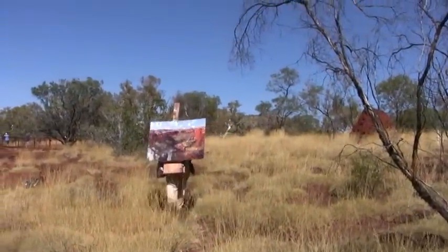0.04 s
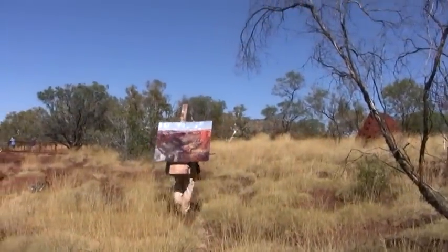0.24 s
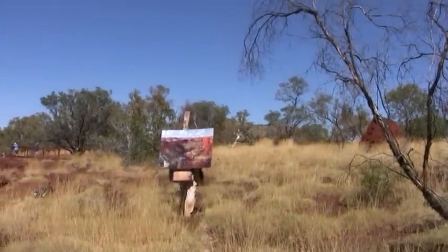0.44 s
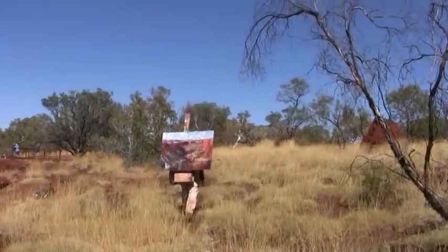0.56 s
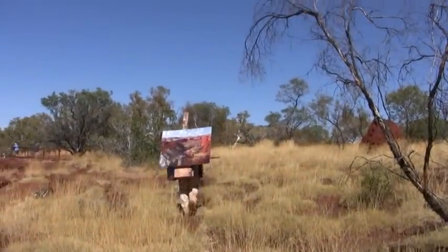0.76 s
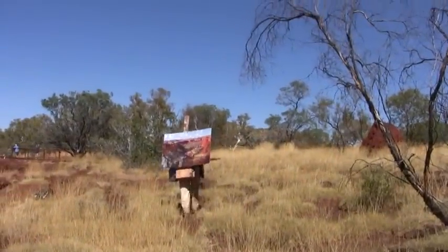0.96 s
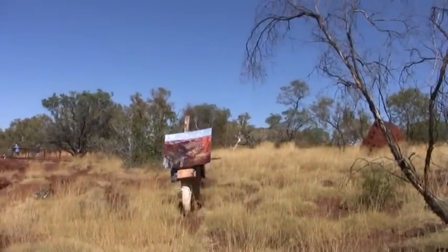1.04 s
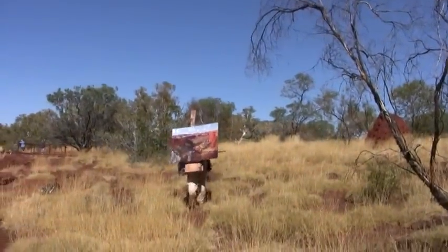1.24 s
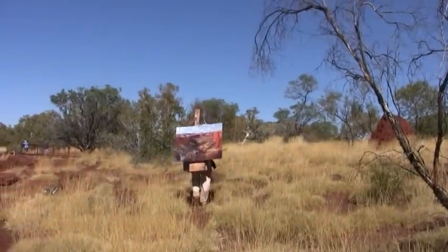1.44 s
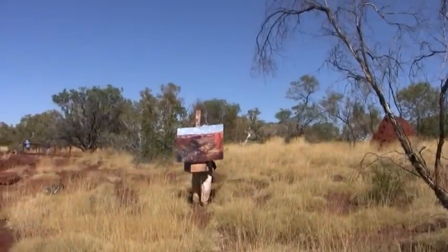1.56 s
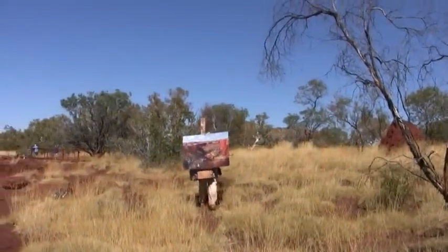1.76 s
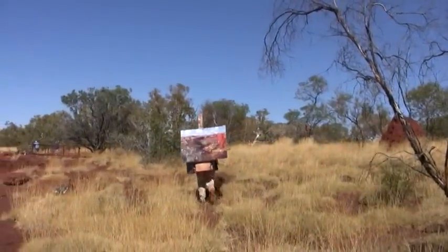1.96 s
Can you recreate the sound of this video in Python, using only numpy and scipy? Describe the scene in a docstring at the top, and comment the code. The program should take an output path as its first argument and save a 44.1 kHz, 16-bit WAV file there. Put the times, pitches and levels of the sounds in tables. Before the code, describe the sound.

Slow footsteps crunch through dry grass and gritty soil close to the microphone, with stalks swishing and snapping. Low wind gusts thump at the start and end, a wooden knock comes late, and distant birds chirp outdoors.

```python
"""Open bushland: someone carrying a wooden easel walks through dry grass, close to the microphone.
Soles crunch and stalks swish as shaped streams of tiny fractures; twigs and clods crack as rough rings,
stalks snap as noise bursts, and the easel knocks softly as fading wood tones.
Gusts thump on the microphone as low, uneven noise. Far birds chirp in arched tones over a flock of
wavering ones, with a scattered tail, above a steady hush of coloured noise."""
import sys
import numpy as np
from scipy import signal
from scipy.fft import rfft, irfft, next_fast_len
from scipy.io import wavfile
from scipy.ndimage import uniform_filter1d, map_coordinates

SR = 44100
rng = np.random.default_rng(int(sys.argv[2]) if len(sys.argv) > 2 else 0)


def to_wav(s):
    """Save 16-bit WAV."""
    ch = np.atleast_2d(s).T  # columns
    pcm = np.round(np.clip(ch, -1, 1) * 32767)  # PCM
    wavfile.write(sys.argv[1], SR, pcm.astype(np.int16))


N = 88464

# How alike footfall and grass sound left and right. Each row: frequency in Hz, coherence from 0 to 1.
STEP_ALIKE = [(400, 0.98), (1200, 1), (2200, 1), (4000, 0.87), (10000, 0.59)]


def amp(db):
    """Decibels to gain."""
    return 10 ** (np.asarray(db) / 20)


def unit(x):
    """Scale to an rms of 1, over both channels together."""
    return x / np.sqrt(np.mean(x ** 2) + 1e-20)


def clock():
    """Time of each sample in seconds."""
    return np.arange(N) / SR


def curve(rows):
    """Join rows of seconds and value by straight lines, one value per sample."""
    return np.interp(clock(), *np.transpose(rows))


def along(points, hz):
    """Read points of Hz and value on a log frequency axis."""
    f, v = np.transpose(points)
    return np.interp(np.log(hz + 1), np.log(f + 1), v)


def wobble(rate):
    """A smooth random curve through normally distributed knots, rate of them a second."""
    knots = rng.standard_normal(4096)
    return map_coordinates(knots, [clock() * rate + 2], mode="wrap")


def filtered(x, response):
    """Multiply the spectrum of x by a response of frequency."""
    m = next_fast_len(N + SR // 2)
    hz = np.fft.rfftfreq(m, 1 / SR)
    return irfft(rfft(x, m) * response(hz), m)[..., :N]


def spread(pair, spectrum, alike):
    """Colour two unrelated signals and blend them into left and right of a given coherence."""
    def mid_side_response(hz):
        turn = np.arccos(np.clip(along(alike, hz), -1, 1)) / 2
        return amp(along(spectrum, hz)) * [np.cos(turn), np.sin(turn)]

    mid, side = filtered(pair, mid_side_response)
    return np.array([mid + side, mid - side])


def grains(rate, spread_db):
    """Two streams of tiny fractures: random clicks of uneven size, rate of them a second."""
    size = amp(spread_db * np.minimum(rng.exponential(size=(2, N)), 4))
    happens = rng.random((2, N)) < rate / SR
    return happens * size * rng.choice([-1, 1], (2, N))


def strokes(rows, attack_s, release_s):
    """Each stroke rises up to its start, holds its length and dies away; their powers add."""
    t = clock()
    each = []
    for start, length, db in rows:
        attack = np.clip(1 + (t - start) / attack_s, 0, 1)
        release = np.exp(-np.maximum(t - start - length, 0) / release_s)
        each.append(amp(db) * attack * release)
    return np.linalg.norm(each, axis=0)


def two_toned_strokes(rows, attack_s, release_s, main, other):
    """Strokes that each blend two textures; the last column is the other texture's share of power."""
    out = np.zeros((2, N))
    for start, length, db, share in rows:
        share = np.clip(share, 0, 1)
        texture = np.sqrt(1 - share) * main + np.sqrt(share) * other
        out += strokes([(start, length, db)], attack_s, release_s) * texture
    return out


def add(track, s, sound):
    """Mix a sound into a track at a time in seconds."""
    part = track[..., max(round(s * SR), 0):][..., :sound.shape[-1]]
    part += sound[..., :part.shape[-1]]


def hush():
    """Steady air in far grass and trees: coloured noise, less alike left and right toward the treble."""
    # Colour of the air. Each row: frequency in Hz, relative level in dB.
    air_colour = [(20, -10), (50, 2), (100, -16), (160, -16.5), (280, -8.5), (400, -15), (540, -9.5),
                  (700, -14), (850, -12.5), (1100, -17), (1750, -15.5), (2100, -19.5), (2800, -20.5),
                  (3200, -16.5), (3650, -22.5), (4200, -23), (6000, -26), (10000, -29.5), (15700, -36)]
    # Left-right likeness. Each row: frequency in Hz, coherence from 0 to 1.
    air_alike = [(60, 1), (300, 0.98), (550, 0.79), (1200, 0.81), (2500, 0.64), (5000, 0.13),
                 (10000, 0.043)]
    air = unit(spread(rng.standard_normal((2, N)), air_colour, air_alike))
    return air * amp(-51.5 + 0.61 * wobble(6.56))


def eddies(spectrum):
    """Low turbulence: coloured noise with its short-term power evened out."""
    # Left-right likeness at the microphone. Each row: frequency in Hz, coherence from 0 to 1.
    wind_alike = [(40, .94), (100, .93), (250, .88)]
    pair = spread(rng.standard_normal((2, N)), spectrum, wind_alike)
    power = np.mean(np.abs(signal.hilbert(pair)) ** 2, axis=0)
    local_power = np.abs(uniform_filter1d(power, size=700))
    return unit(pair / np.sqrt(local_power + 1e-20))


def wind():
    """Gusts on the microphone: turbulent rumble with single thumping eddies and a higher flutter."""
    # Gust strength. Each row: time in seconds, level in dB before the rumble trim.
    gusts = [(0, -31), (.17, -35), (.3, -49), (.5, -38), (.64, -47.5), (.78, -55), (.9, -56), (1.0, -50),
             (1.08, -65), (1.35, -72), (1.47, -64), (1.62, -56), (1.72, -47), (1.8, -59), (1.9, -30),
             (2.0, -46)]
    # Single eddies thumping. Each row: start in seconds, length in seconds, level in dB before the trim.
    thumps = [(0.0, .015, -29), (.08, .03, -29.5), (.13, 0.019, -30), (.262, 0.026, -27),
              (.3, 0.041, -32.5), (.385, 0.022, -34.5), (.448, 0.0087, -32.5), (.478, 0.011, -29.5),
              (.602, 0.017, -38.5), (.805, 0.031, -47.5), (.935, 0.037, -43), (1.005, 0.023, -44.5),
              (1.405, 0.02, -42.5), (1.552, 0.02, -44), (1.578, 0.0085, -44), (1.753, 0.013, -31),
              (1.776, 0.01, -29), (1.806, 0.015, -29), (1.838, 0.031, -24), (1.928, .026, -26.5),
              (1.964, 0.021, -28), (1.997, 0.016, -19.5)]
    # Strongest gusts fluttering higher up. Each row: start in seconds, length in seconds, level in dB.
    flutters = [(.08, 0.027, -52), (1.83, 0.068, -64), (1.9, 0.024, -38), (1.975, .04, -32)]
    # Colours of rumble and flutter. Each row: frequency in Hz, relative level in dB.
    rumble_colour = [(15, -31), (25, -45), (45, -2), (70, 3.5), (100, 5), (135, 1), (180, -5.5),
                     (235, -13.5), (340, -26), (500, -35.5), (900, -70)]
    flutter_colour = [(80, -20.5), (170, -8), (240, -1.5), (330, -16), (500, -26.5), (1000, -57)]
    # Where the gust presses harder. Each row: time in seconds, dB added on the left and taken on the right.
    lean = [(0, .8), (.6, .2), (2, .05)]
    lump_db, lumps_per_s, rumble_trim_db = 1, 40, -1

    gusting = amp(curve(gusts) + lump_db * wobble(lumps_per_s))
    thumping = strokes(thumps, attack_s=.007, release_s=.007)
    rumble = amp(rumble_trim_db) * np.hypot(gusting, thumping) * eddies(rumble_colour)
    flutter = strokes(flutters, attack_s=0.011, release_s=.02) * eddies(flutter_colour)
    return (rumble + flutter) * amp(np.outer([1, -1], curve(lean)))


def crunches():
    """Soles press on gritty soil: fractures come in clumps, blending bright grit and dull soil."""
    # Each row: start in seconds, length in seconds, level in dB, share of dull soil from 0 to 1.
    presses = [(0.0, 0.015, -44.5, 0.47), (0.062, 0.087, -54.5, 0.03), (0.535, 0.05, -44.5, 0.55),
               (0.592, 0.034, -46, 0.64), (0.664, 0.018, -50, 0), (0.691, 0.0095, -46, 0.35),
               (0.716, 0.032, -51, 0.26), (1.193, .085, -52, 0.18), (1.301, 0.11, -54.5, 0.52),
               (1.707, 0.018, -51, 0.7), (1.747, 0.039, -55, 0.05), (1.865, 0.029, -57.5, 0),
               (1.964, 0.0065, -40.5, 0), (1.98, 0.023, -65, 1)]
    # Colours of grit and soil. Each row: frequency in Hz, relative level in dB.
    grit_colour = [(300, -7), (700, 3), (1150, 0), (1600, 1), (2200, -2), (3000, -10.5), (5000, -22.5),
                   (15000, -24)]
    soil_colour = [(150, -35), (330, -7), (520, 3), (750, -13.5), (1100, -20), (2500, -56)]
    grains_per_s, size_spread_db, clump_db = 3000, 3, 1.8

    def crumble(colour):
        clumped = grains(grains_per_s, size_spread_db) * amp(clump_db * wobble(170))
        return unit(spread(clumped, colour, STEP_ALIKE))

    return two_toned_strokes(presses, 0.0068, 0.012, crumble(grit_colour), crumble(soil_colour))


def grass():
    """Stalks brush a leg in a dense crackle, their fine tips hiss; now and then one snaps as a noise burst."""
    # Brushes. Each row: start in seconds, length in seconds, level in dB, share of airy hiss from 0 to 1.
    swishes = [(0.0, 0.015, -49.5, 0.01), (0.041, 0.14, -61, 0.15), (0.544, 0.043, -50, 0.13),
               (0.602, 0.056, -58, 0.08), (0.676, 0.038, -57, 0.36), (0.727, 0.12, -64.5, 0.5),
               (0.972, 0.042, -56.5, 0.7), (1.034, .02, -65, 0.95), (1.86, 0.041, -54.5, 0.05),
               (1.924, 0.019, -55.5, 0)]
    # Dry stalks snapping. Each row: start in seconds, starting level in dB before the filters,
    # high-pass corner in Hz (thin stalks snap higher).
    snap_rows = [(.546, -39, 3000), (.559, -39, 3000), (.586, -40, 4000), (.701, -36, 5000),
                 (.7455, -38, 8500), (1.198, -38, 3500), (1.352, -42, 3500), (1.81, -42, 2000),
                 (1.874, -38, 2000), (1.969, -44, 3000)]
    # Colours of stalks and of fine tips. Each row: frequency in Hz, relative level in dB.
    straw_colour = [(800, -1), (2500, 11.5), (4000, 7.5), (6300, 4.5), (9000, -7.5), (12000, -3.5),
                    (16000, -16)]
    airy_colour = [(3000, -23), (5500, -4), (8000, 1), (12000, -2.5), (16000, -12.5)]
    grains_per_s, size_spread_db, snap_decay_s = 2200, 4.2, .0007

    def scrape(colour):
        uneven = grains(grains_per_s, size_spread_db) * amp(0.5 * wobble(150))
        return unit(spread(uneven, colour, STEP_ALIKE))

    swish = two_toned_strokes(swishes, 0.008, 0.0085, scrape(straw_colour), scrape(airy_colour))
    snaps = np.zeros((2, N))
    t = np.arange(SR // 50) / SR
    for s, db, low_hz in snap_rows:
        burst = amp(db) * np.exp(-t / snap_decay_s) * rng.standard_normal((2, len(t)))
        high_pass = signal.butter(2, low_hz, "high", fs=SR)
        add(snaps, s, signal.lfilter(*high_pass, burst))
    return swish + spread(snaps, straw_colour, STEP_ALIKE)


def birds():
    """Far chirps stand over a flock of five wavering tones; the bush scatters both into a fading tail."""
    # The rest of the flock. Each row: time in seconds, level in dB before the tail.
    flock_level = [(0, -66), (.5, -66), (.75, -60.5), (1.1, -68), (1.3, -61), (1.65, -61), (1.75, -66),
                   (2, -67)]
    flock_hz, swing_hz, bush_db, bush_t60_s = 3610, 105, -7, .3

    warble = np.zeros(N)
    for _ in range(5):
        strength = amp(2.8 * wobble(60))
        phase = 2 * np.pi * np.cumsum(flock_hz + swing_hz * wobble(110)) / SR
        warble += strength * np.sin(phase)
    song = chirps() + unit(warble) * amp(curve(flock_level))

    t = np.arange(SR // 3) / SR
    tail = rng.standard_normal((2, len(t))) * amp(-60 * t / bush_t60_s)
    tail /= np.linalg.norm(tail[0])
    return song + amp(bush_db) * signal.fftconvolve(song[None], tail, axes=1)[:, :N]


def cracks():
    """Twigs and clods break underfoot: each a rough, splintery ring of a few cycles."""
    # Each row: start in seconds, starting level of the ring in dB before colouring, pitch in Hz.
    breaks = [(.015, -38, 1700), (.043, -40, 1400), (.112, -37, 1900), (.178, -41, 800), (.336, -40, 1700),
              (.447, -43, 1500), (.465, -41, 1200), (.521, -31, 1300), (.532, -28.5, 1500),
              (.556, -32, 1600), (.574, -33, 1200), (.62, -33, 1000), (.635, -38, 1200), (.6635, -32, 1700),
              (.691, -34, 1400), (.703, -33, 1900), (.707, -30, 1300), (1.19, -40, 1900), (1.21, -36, 1600),
              (1.223, -38, 1200), (1.235, -29, 1500), (1.2655, -30, 1500), (1.271, -38, 2000),
              (1.578, -35, 1100), (1.81, -37, 1200), (1.937, -37, 1600), (1.948, -39, 1600),
              (1.961, -35, 1900), (1.972, -37, 1800)]
    decay_cycles, roughness = 1.6, .4
    colour = [(200, 13), (600, -3), (2400, -0.5), (5000, -10.5), (15000, -45)]  # Hz, dB

    out = np.zeros(N)
    t = np.arange(SR // 50) / SR
    for s, db, hz in breaks:
        splinters = unit(signal.lfilter([1], [1, -.7], rng.standard_normal(len(t))))
        ring = np.sin(2 * np.pi * hz * t) + roughness * splinters
        add(out, s, amp(db) * np.exp(-t * hz / decay_cycles) * ring)
    return filtered(out, lambda hz: amp(along(colour, hz)))


def chirps():
    """One far bird repeats a short arch: a tone with a slow rise and a quick drop."""
    # Each row: time of the top in seconds, level in dB rms at the top before the tail, top pitch in Hz.
    calls = [(.894, -60, 3760), (1.008, -55, 3570), (1.126, -55.5, 3760), (1.234, -58, 3680),
             (1.346, -60, 3540), (1.465, -57, 3640), (1.574, -54.5, 3700), (1.689, -56, 3720),
             (1.794, -56, 3720), (1.902, -57, 3720)]
    # Shape of every chirp. Each row: seconds from its top, share of the top pitch, relative level in dB.
    arch = [(-.03, .82, -25), (-.02, .86, -7), (-.008, .94, -1), (0, 1, 0), (.006, .97, 0), (.014, .78, -1),
            (.02, .68, -22)]
    song = np.zeros(N)
    when, pitch, level = np.transpose(arch)
    t = np.arange(when[0], when[-1], 1 / SR)
    for s, db, top_hz in calls:
        phase = 2 * np.pi * np.cumsum(top_hz * np.interp(t, when, pitch)) / SR
        loudness = amp(db + np.interp(t, when, level)) * np.sqrt(2)
        add(song, s + t[0], loudness * np.sin(phase))
    return song


def easel():
    """Loose wooden parts tap each other: every knock excites the same fading modes, shifted in pitch."""
    # Each row: start in seconds, level in dB, tilt in dB per octave about 1 kHz, pitch factor.
    knocks = [(1.163, -44, -11.5, 1.24), (1.283, -44.5, -5, 1.1), (1.6588, -28, 2.5, 1.007),
              (1.696, -39.5, 2, 1), (1.712, -38, 7.5, 0.85)]
    # Modes of the wood. Each row: frequency in Hz before the pitch factor, relative level in dB,
    # time to fade by 60 dB in seconds.
    wood_modes = [(517, -6.5, .075), (1087, -8, 0.058), (1200, -5, .045), (1465, -12, 0.023),
                  (1890, -25, 0.035), (2800, -23, .02), (5000, -33, 0.013)]
    out = np.zeros(N)
    t = np.arange(SR // 5) / SR
    onset = 1 - np.exp(-t / 0.0006)
    for s, db, tilt_db, pitch in knocks:
        for hz, level, t60 in wood_modes:
            gain_db = db + level + tilt_db * np.log2(hz / 1000) + rng.normal(0, 1)
            add(out, s, amp(gain_db - 60 * t / t60) * np.sin(2 * np.pi * hz * pitch * t) * onset)
    return out


def scene():
    """The walker, the wind and the bush around them."""
    return crunches() + grass() + cracks() + easel() + wind() + birds() + hush()


def record(dry):
    """The camera drops the deepest bass and keeps nothing above its band limit."""
    low_cut_hz, top_hz = 51, 15780
    return filtered(dry, lambda hz: (hz < top_hz) * hz ** 2 / np.hypot(hz ** 2, low_cut_hz ** 2))


dry = scene()
out = record(dry)
to_wav(out)
```